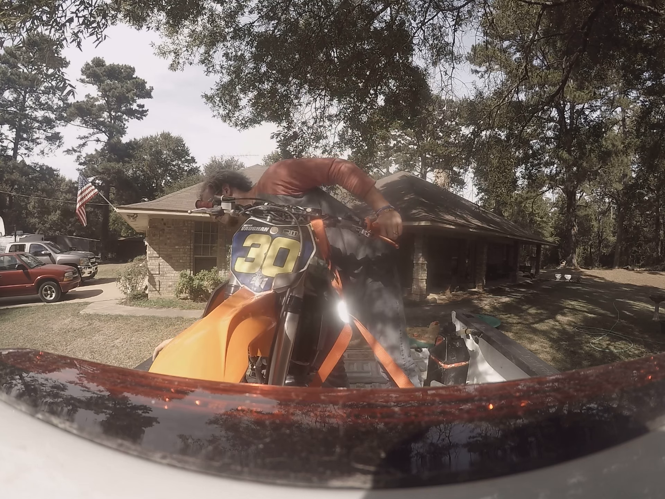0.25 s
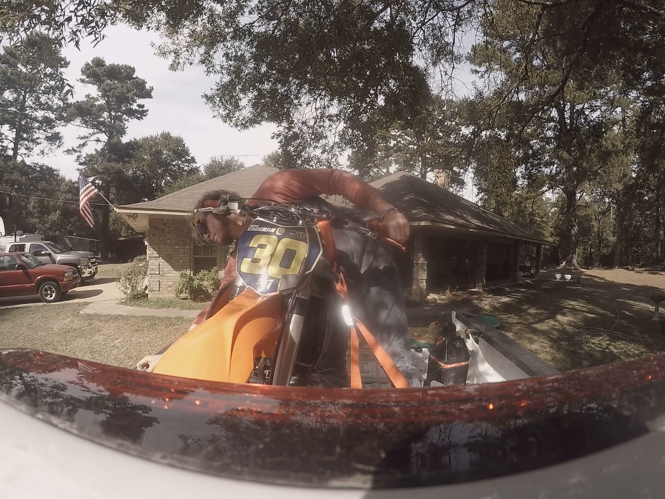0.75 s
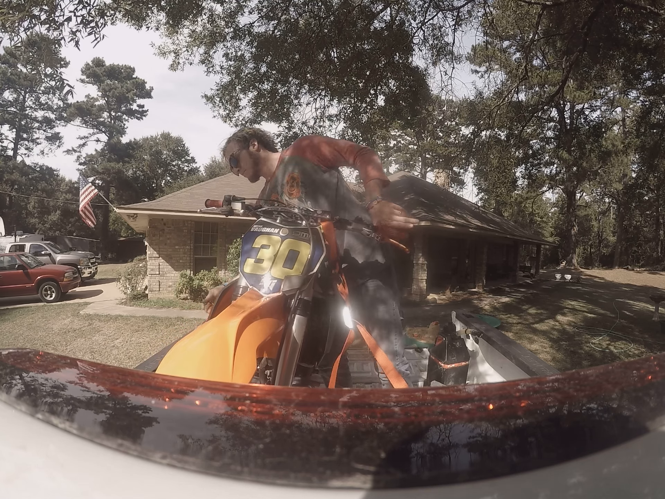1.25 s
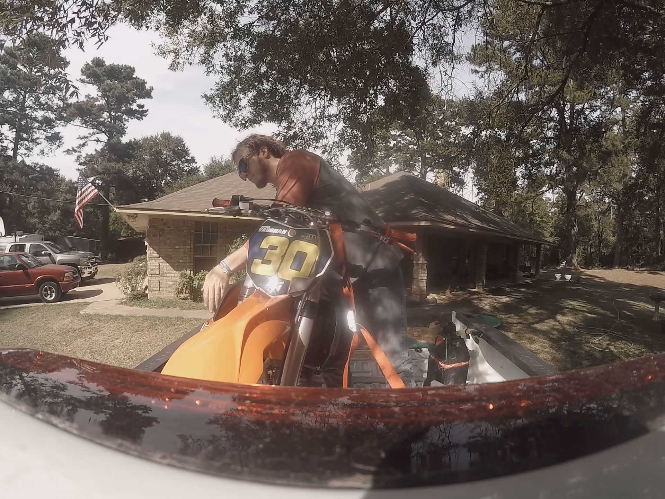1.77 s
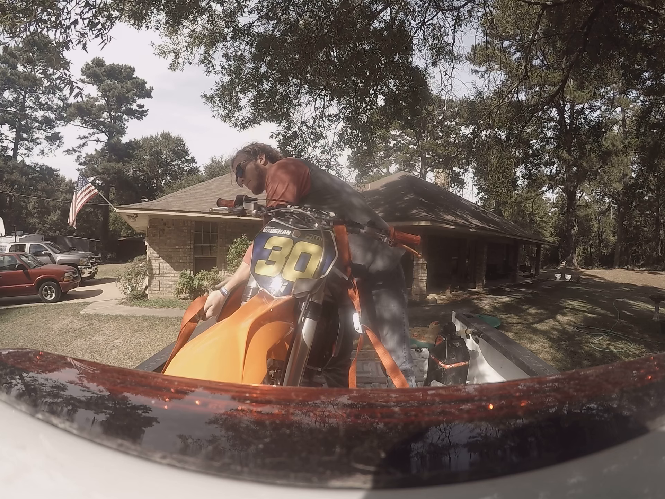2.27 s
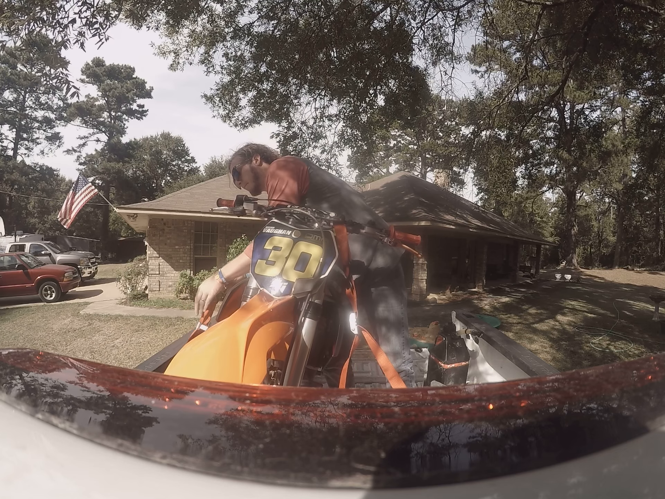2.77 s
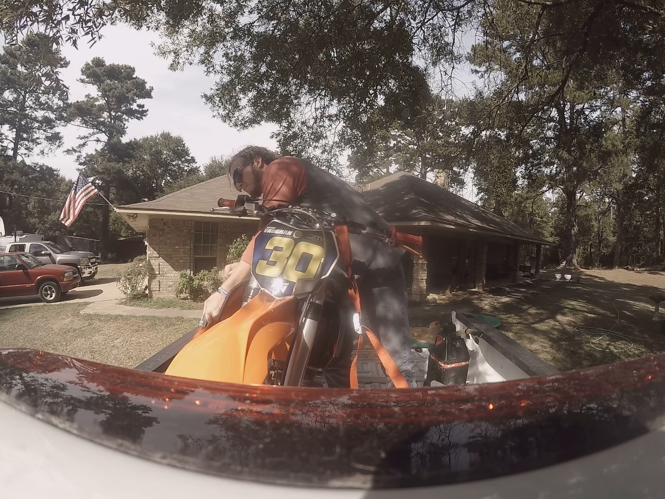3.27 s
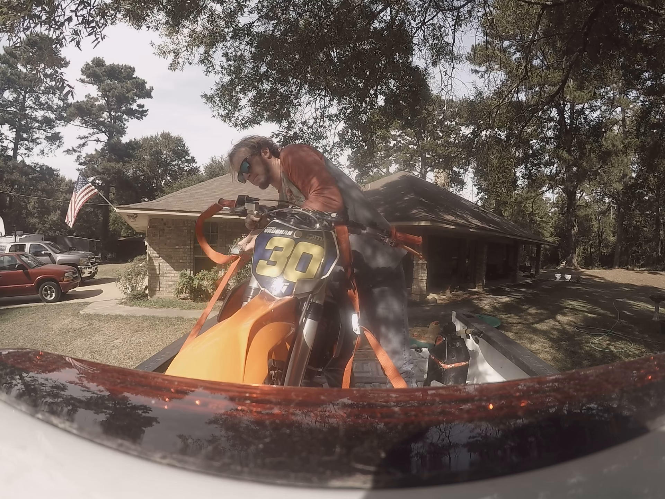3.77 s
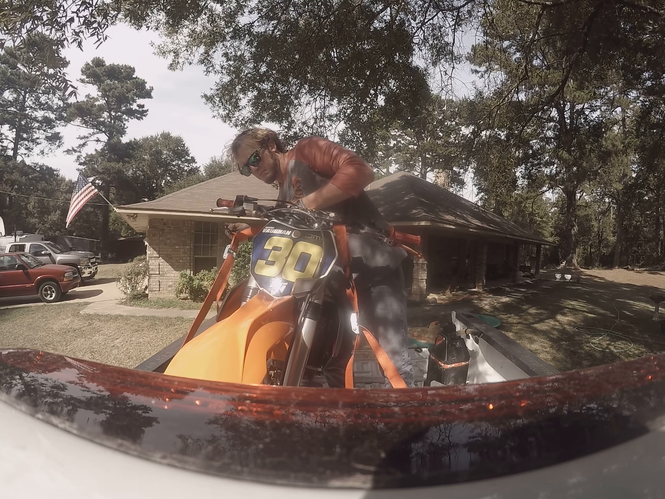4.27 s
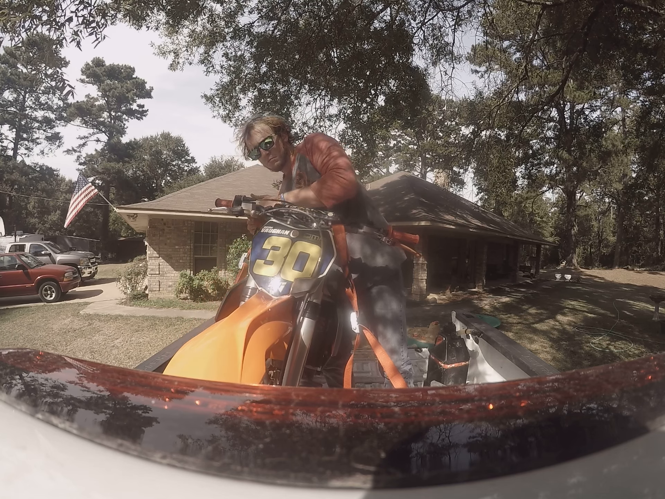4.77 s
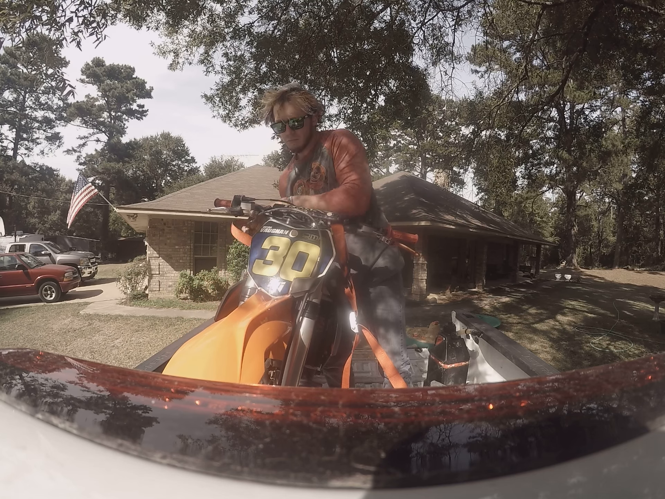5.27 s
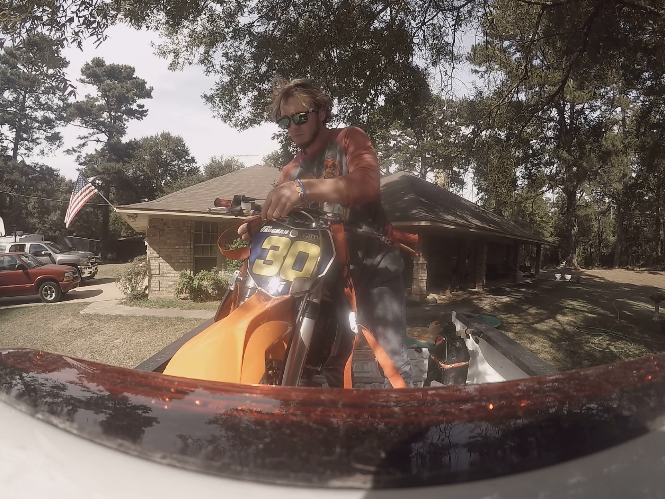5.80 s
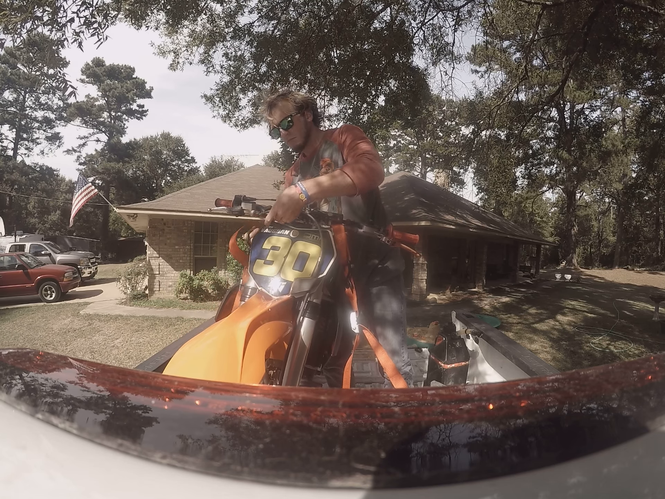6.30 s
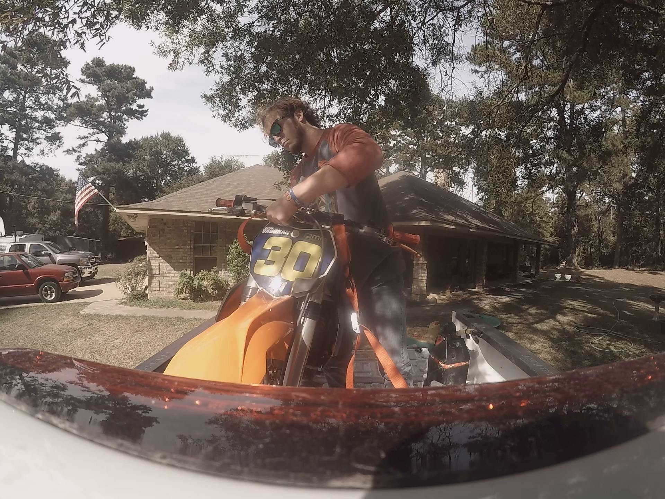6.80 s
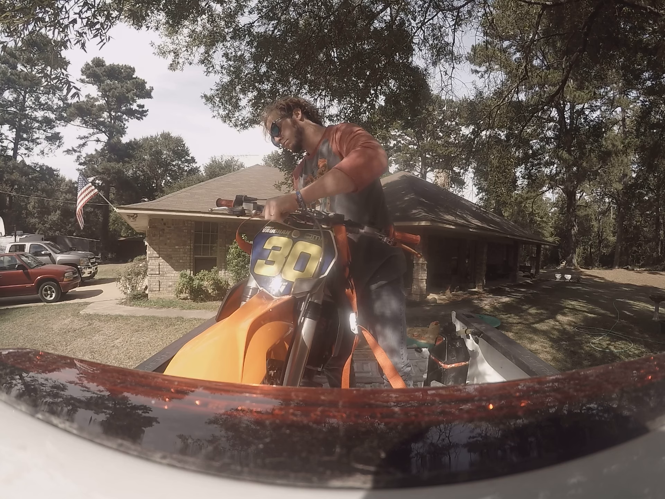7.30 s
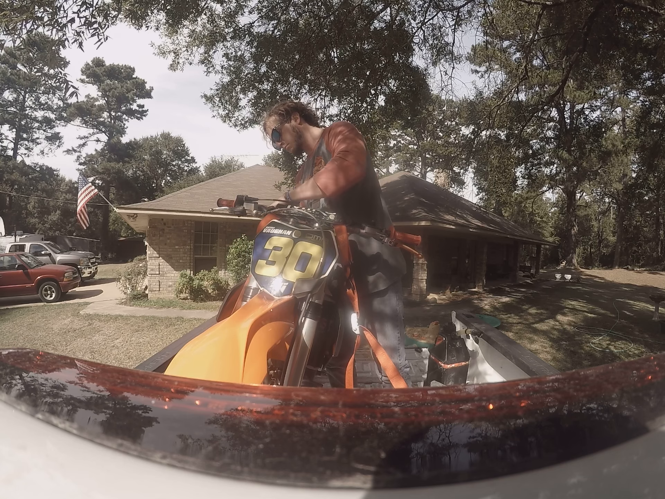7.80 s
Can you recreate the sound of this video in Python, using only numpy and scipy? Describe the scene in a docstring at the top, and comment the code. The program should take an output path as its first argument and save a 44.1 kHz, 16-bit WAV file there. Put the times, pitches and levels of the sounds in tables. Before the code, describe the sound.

Outdoors on a pickup, a heavy bed thump and loud metallic bang, then buckle clacks, zipping strap webbing, hook clinks and low gusty wind.

```python
"""Outdoors, on the roof of a pickup's cab: a motorbike is tied down in the bed behind.
Filtered noise bursts and ringing modes make the bed thump, the bike bang and the buckle clack.
Webbing hauled through the buckle is hissing, droning noise; a hook clinks in decaying sines, with dry ticks.
Beneath lie low, gusty wind noise with single eddies, a bed of still air, and faint insects:
one ticks in rasps of high noise, others trill in fuzzy, sagging whistles."""
import sys
import numpy as np
from scipy import signal
from scipy.fft import rfft, irfft, next_fast_len
from scipy.io import wavfile
from scipy.ndimage import uniform_filter1d

SR = 44100
rng = np.random.default_rng(int(sys.argv[2]) if len(sys.argv) > 2 else 0)


def materialize(psi):
    """Save the field psi as 16-bit PCM at rate SR to the path in sys.argv[1].

    A 1-D psi becomes a single channel; in a 2-D psi each row is a channel.
    """
    bounded = np.clip(np.atleast_2d(psi).T, -1, 1)
    quanta = np.round(bounded * 32767).astype(np.int16)
    wavfile.write(sys.argv[1], SR, quanta)


N = 355005
T = np.arange(N) / SR

# Levels in spectra and modes are relative; the events set how loud they come out.
# bands of a blow, boom, body, clack, snap, fizz: low edge f/Hz, high edge f/Hz, basic t60/s, rise/s
BANDS = [(66.8, 323, 0.9, 0.005), (277, 960, 0.56, 0.00033), (900, 2070, 0.36, 0.00063),
         (2200, 4630, 0.24, 0.0016), (4530, 13000, 0.24, 0.000427)]
BODY_HZ = 509  # a blow's hardness tilts the bands above the boom around this pitch

# dull thumps on the truck bed: t/s, basic level/dB, weight (boom over body)/dB,
# hardness/(dB per octave), ring time/factor
THUMPS = [(.662, -29, -2, -7.5, 0.73), (.745, -40.5, -2, -7, 0.57), (.812, -21.5, -0.5, -4.5, 0.8),
          (3.892, -51, 10, -1.5, 0.4), (4.356, -45.5, -2, -4, 0.33), (4.9, -45, -6.5, -11, 0.44),
          (5.668, -36.5, -11.5, -13, 0.45), (6.2, -41, -4, -10, 1), (6.662, -53, 8.5, -9, 0.6),
          (6.785, -44, 1.5, -7, 0.83), (7.005, -54.5, 2, -11, 0.21), (7.479, -36, -2.5, -7.5, 0.44),
          (7.502, -44, -2.5, -3.5, 0.75), (7.635, -43, -6.5, -17, 0.85)]
# modes of the bed: f/Hz, level/dB
BED_MODES = [(76, 6), (126, -19), (168, 1), (226, -3.5), (256, -4.5), (305, 6), (344, 0), (372, 11),
             (481, 3.5), (550, 1.5), (598, -1.5), (632, 15), (670, 4.5), (1106, -11), (1191, 3),
             (1243, -47), (1296, 3.5), (1850, -12.5), (2571, -19), (2717, -41), (3209, -41), (3586, -28)]
# diffuse ringing of the bed: f/Hz, level/dB
BED_COLOUR = [(40, -6.5), (110, 3.5), (220, 12), (600, 0), (1000, -1), (1900, -12), (2300, -17),
              (3300, -12), (4500, -27.5), (8000, -43.5), (15000, -45)]

# hardware banging on the bike as the strap snaps taut: t/s, basic level/dB, weight/dB,
# hardness/(dB per octave), ring time/factor
BANGS = [(1.142, -39, -10, -6.5, 1.7), (1.261, -14.5, -13.5, -2.5, 0.94), (1.422, -41.5, -19, -4.5, 1.4)]
# modes of the bike: f/Hz, level/dB
BIKE_MODES = [(327, 0.5), (362, -2.5), (590, 2.5), (617, 2.5), (689, 8.5), (738, 4), (768, -8), (822, -1.5),
              (961, -3), (1255, 2.5), (1620, -7), (1675, -16.5), (1810, -9.5), (1861, -30), (1928, -6),
              (2452, -21), (2626, -18), (2676, -24), (2741, -16.5), (2862, -21), (2919, -8), (3123, -10),
              (4131, -18), (4302, -31.5), (5554, -22), (6608, -37.5), (7118, -45.5), (7434, -43.5),
              (7624, -33)]
# diffuse ringing of the bike: f/Hz, level/dB
BIKE_COLOUR = [(100, -13.5), (230, -14), (320, -1), (480, -13.5), (780, -5), (1150, -17.5), (1800, -14),
               (2150, -22), (2800, -5.5), (4200, -14), (5500, -25.5), (7500, -21), (9000, -33),
               (15000, -37.5)]

# clacks of the buckle: t/s, basic level/dB, weight/dB, hardness/(dB per octave), ring time/factor
CLACKS = [(1.089, -50, -11, 0, .9), (2.262, -45, -4, -5, 0.97), (2.394, -38.5, -6, -3, 0.87),
          (2.724, -42.5, -8, -3, .89), (2.849, -41.5, -18.5, -6, 0.66), (2.916, -38.5, -2, -2, 0.86),
          (3.04, -36.5, -6, -4.5, 0.89), (3.372, -40, -26, -9, 1), (3.423, -37, -14, -1.2, 1),
          (4.071, -35, -6, -2.5, .91), (4.618, -36.5, -12.5, -5, .74), (4.877, -45, -1.5, -7.5, .52),
          (5.007, -43.5, -31, -11, 0.72), (5.085, -27.5, -13.5, -5, 0.99), (5.261, -31, -7.5, -3, 0.98),
          (5.334, -37.5, -4, -7, 0.42), (5.418, -38.5, -6, -9, 1), (6.235, -36, -5.5, -7, 0.68),
          (6.431, -39.5, 0, -1.96, 0.75)]
# modes of the buckle on its strap: f/Hz, level/dB
BUCKLE_MODES = [(298, -4), (330, -1), (360, -2.5), (461, -11.5), (493, -14.5), (617, -3.5), (742, -17),
                (1018, -9.5), (1126, -13.5), (1168, -5.5), (1321, -10.5), (1355, -12.5), (1430, -15.5),
                (1720, -8.5), (1950, -18.5), (2400, -11), (2627, -7.5), (2737, -8.5), (2834, -9),
                (2920, -9), (3480, -9), (3820, -1.5), (4007, -32.5), (4106, -11.5), (4290, -37.5),
                (4443, -48), (5380, -27.5), (6139, -38.5), (7788, -12.5), (8150, -23.5)]
# diffuse ringing of the buckle: f/Hz, level/dB
BUCKLE_COLOUR = [(70, -24), (230, -5.5), (330, 3), (620, 6), (850, -2), (1150, 5), (1950, -6.5),
                 (2250, -16.5), (2800, -11.5), (4400, -18.5), (5800, -30), (8300, -37), (9500, -43.5),
                 (15000, -49)]

# two hauls of webbing through the buckle, each a curve: t/s, effort/dB
PULLS = [
    [(1.14, -26), (1.15, -39), (1.21, -28.5), (1.242, -21), (1.255, -14)],
    [(3.35, -67), (3.376, -34.5), (3.442, -35.5), (3.47, -41.5), (3.608, -34.5), (3.654, -21.5),
     (3.734, -21.5), (3.804, -35), (3.95, -51.5)],
]
# hiss against drone at the reference effort, one per haul: level/dB
PULL_HISS_DB = [-6, -12.5]
REFERENCE_EFFORT_DB = -22
HISS_GROWTH = 1.05  # dB of hiss gained for each dB of effort
# rustles of loose webbing in the hands: middle t/s, level/dB, half length/s
RUSTLES = [(0.104, -47.5, 0.097), (0.66, -45.5, 0.046), (1.384, -56.5, 0.84), (2.21, -61.5, 0.072),
           (2.998, -51, 0.12), (3.973, -60.5, 0.12), (4.508, -60.5, 0.051), (5.094, -54.5, 0.37),
           (5.694, -55.5, 0.36), (6.524, -50, 0.15), (6.824, -49, 0.083), (7.667, -51, 0.094),
           (8.042, -50, 0.051)]
# tone of the rubbing weave: f/Hz, level/dB
WEBBING_COLOUR = [(100, -5.5), (230, 4), (320, -0.5), (440, 6), (570, -0.5), (800, -3), (1100, -6.5),
                  (1900, -18.5), (2200, -21.5), (2700, -21.5), (3300, -27.5), (4500, -26.5), (7000, -41),
                  (15000, -54)]
# resonances driven by the taut strap: f/Hz, level/dB
STRAP_MODES = [(224, -6.5), (297, -3), (348, 3), (514, -0.5), (562, 5.5), (592, 7), (633, -24), (750, -2.5),
               (1165, -19.5), (1266, -8.5)]

# clinks of the hook: t/s, level/dB, hardness/(dB per octave),
# level of the ring near 4.2 kHz/dB (above 0 weaker, below 0 stronger)
CLINKS = [(1.222, -29.5, -1, 1), (1.232, -35, -2, -3), (1.244, -35, -1, -6), (6.235, -43.5, -8.5, 14),
          (6.434, -46, -7.5, 21), (6.55, -41, -3, -3), (6.754, -40, -2.5, -0.5), (6.821, -38, -1, -4.5),
          (6.836, -40, -3, 4)]
# modes of the hook: f/Hz, level/dB, t60/s
HOOK_MODES = [(1077, -4.5, 0.24), (1330, -14, 0.16), (1624, -9, 0.13), (2140, -15.5, 0.111),
              (2740, -10, 0.11), (3090, 1.5, 0.072), (3280, -8, 0.14), (3416, 2, 0.17), (3560, -29, 0.138),
              (3820, -5, 0.2), (4190, 3.5, 0.21), (4302, 1.5, 0.25), (4901, -7, 0.37), (6840, -24, .26)]
# small dry ticks of the hardware: t/s, level/dB, centre f/Hz, t60/s
TICKS = [(.297, -42, 1380, 0.041), (3.371, -45.5, 2940, 0.037), (3.874, -33, 3800, 0.0064),
         (4.14, -55.5, 2540, .13), (5.42, -70, 2760, .14), (5.563, -42, 1990, .028),
         (5.639, -47.5, 2200, 0.023), (5.842, -29, 900, 0.015), (5.957, -58, 2450, .08),
         (6.257, -42, 2200, .05), (6.401, -34.5, 900, 0.057), (6.471, -45.5, 3160, .02),
         (6.487, -47.5, 2400, 0.018), (6.896, -50.5, 2820, .061), (7.26, -55.5, 1850, 0.054),
         (7.37, -55.5, 2200, .03), (7.479, -36.5, 900, 0.082), (7.607, -36.5, 800, 0.07)]

# strength of the wind at the microphone, before gusts and trim: t/s, level/dB
WIND = [(0.0, -32), (0.29, -32.5), (0.49, -44.5), (0.94, -39), (1.08, -44.5), (2.62, -47), (3.2, -27),
        (3.27, -45.5), (3.32, -30), (3.45, -41), (3.59, -28), (4.21, -50), (4.26, -37.5), (4.71, -43),
        (4.8, -33), (4.97, -54), (5.11, -35.5), (6.1, -42.5), (6.14, -32.5), (6.37, -49), (6.43, -35),
        (6.99, -33.5), (7.33, -45.5), (7.38, -33), (7.42, -42), (8.05, -56)]
# tone of the wind: f/Hz, level/dB
WIND_COLOUR = [(10, -20), (26, 6.5), (50, -0.5), (78, -5), (115, -14), (170, -25), (300, -44), (800, -86)]
# single eddies striking the microphone: t/s, peak level/dB, f/Hz
EDDIES = [(3.07, -23.5, 44.7), (3.109, -21, 50.3), (3.147, -18, 84), (3.168, -25, 35.7),
          (3.316, -23.5, 32.7), (3.574, -25, 42.3), (5.361, -25, 45.3), (5.44, -28, 35), (6.44, -31, 36),
          (6.548, -24.5, 37.6), (6.607, -22.5, 41.6), (6.754, -22.5, 64), (6.966, -19, 44.3),
          (7.369, -24, 37)]

# tone of the outdoor air: f/Hz, level/dB
AIR_COLOUR = [(59, -25), (100, -3), (140, -5.5), (274, -9), (383, -8), (482, -13), (983, -17),
              (1880, -23.5), (2920, -22.5), (7350, -31), (13800, -36), (15000, -37.5)]
AIR_DB = -59.0
# an insect high in the trees ticks, then doubles its pace: start t/s, length/s, strokes/(per s),
# starting level/dB, swell/(dB per s)
TICKING = [(1.403, 1.6, 13.4, -70, 0.5), (2.995, .78, 27, -77, 15)]
# swells of a distant insect trill: middle t/s, level/dB, half length/s, middle f/Hz
TRILLS = [(2.2, -69, 0.27, 3040), (2.88, -70, 0.14, 3000), (4.87, -71, 0.16, 3000),
          (7.9, -72.5, 0.37, 2990)]
TRILL_SAG_HZ_PER_S, TRILL_WAVER_HZ = 330, 35

EDGE_HZ = 15400  # top of the treble


def amp(db):
    """Decibels to gain."""
    return 10 ** (np.asarray(db) / 20)


def evened(x):
    """Scales to rms 1."""
    return x / np.sqrt(np.mean(x ** 2) + 1e-20)


def add(mix, s, sound):
    """Lays a sound into the mix at s seconds."""
    part = mix[max(round(s * SR), 0):][:len(sound)]
    part += sound[:len(part)]


def band(x, low_hz, high_hz, order=3):
    """Causal band-pass."""
    edges_hz = [low_hz, min(high_hz, SR / 2 - 100)]
    return signal.sosfilt(signal.butter(order, edges_hz, "band", fs=SR, output="sos"), x)


def coloured(x, points):
    """Shapes x by a curve of (f/Hz, level/dB) points, at rms 1."""
    hz, db = np.transpose(points)
    size = next_fast_len(len(x))
    bins_hz = np.fft.rfftfreq(size, 1 / SR)
    gain = amp(np.interp(np.log(bins_hz + 1), np.log(hz), db))
    return evened(irfft(rfft(x, size) * gain, size)[:len(x)])


def wander(per_s):
    """Random motion of rms 1 with per_s turning points a second; it holds still once 4096 are spent."""
    knots = rng.standard_normal(4096)
    return evened(np.interp(T * per_s, np.arange(len(knots)), knots))


def swell(middle_s, half_s):
    """A smooth rise and fall, of height 1."""
    return np.exp(-np.minimum(((T - middle_s) / half_s) ** 2, 50))


def blows(events, modes, colour, bands_db, tonal_db, clatter_db, clatter_s, spread_db, detune,
          crunch_db, mode_ring, body_ring):
    """Each blow clatters briefly, rings the object's modes and echoes; weight booms, hardness brightens.

    Per band, bands_db is how readily the object sounds and tonal_db how clearly its modes ring."""
    out, t = np.zeros(N), T[:SR * 3 // 4]
    head = SR // 25  # the first 40 ms set the level
    hz, mode_db = np.transpose(modes)[:, :, None]
    octaves = np.log2([np.sqrt(low_hz * high_hz) / BODY_HZ for low_hz, high_hz, _, _ in BANDS])
    for s, level_db, weight_db, hardness_db, ring in events:
        tilt_db = np.append(weight_db, hardness_db * octaves[1:])
        levels_db = level_db + np.array(bands_db) + tilt_db
        # contact point and strap tension differ each time
        share, phase, shift = rng.standard_normal((3, len(modes), 1))
        mode_gain = amp(mode_db + spread_db * share)
        mode_hz = hz * (1 + detune * shift)
        tones = (mode_gain * np.sin(2 * np.pi * (mode_hz * t + phase))).sum(0)
        clatter = 1 + amp(clatter_db) * np.exp(-(t / clatter_s) ** 2)  # loud until the parts settle
        echoes = coloured(rng.standard_normal(len(t)), colour)
        echoes = echoes * amp(crunch_db * wander(300)[:len(t)])
        for db, modes_db, (low_hz, high_hz, t60, rise_s) in zip(levels_db, tonal_db, BANDS):
            # light parts hold their low notes less long
            ring_s = t60 * max(ring, .1) * (body_ring if low_hz < BODY_HZ else 1)
            rise, fall_db = 1 - np.exp(-t / rise_s), -60 * t / ring_s
            layers = np.array([tones * amp(fall_db / mode_ring), echoes * amp(fall_db)])
            ringing, diffuse = band(layers * rise * clatter, low_hz, high_hz)
            part = amp(modes_db) * ringing / np.std(ringing[:head]) + diffuse / np.std(diffuse[:head])
            add(out, s, amp(db) * part / np.std(part[:head]))
    return out


def bed_thumps():
    """The truck bed is struck: dull, with steady, mildly detuned modes."""
    return blows(THUMPS, BED_MODES, BED_COLOUR,
                 bands_db=(0.27, -0.077, 0.92, 0.38, -1.2), tonal_db=(-2.5, -5, -4.5, -12, -10),
                 clatter_db=-9, clatter_s=.016, spread_db=0.4, detune=0.0074,
                 crunch_db=1.0, mode_ring=1.06, body_ring=1.0)


def bike_bangs():
    """Hardware strikes the bike: its modes ring clearly and their balance varies from bang to bang."""
    return blows(BANGS, BIKE_MODES, BIKE_COLOUR,
                 bands_db=(-0.94, -0.012, -0.68, 0.77, -2.1), tonal_db=(-1, -2, -5, -4, -3),
                 clatter_db=-3.0, clatter_s=0.03, spread_db=4.3, detune=0.00081,
                 crunch_db=-2.4, mode_ring=0.86, body_ring=0.88)


def buckle_clacks():
    """The buckle clacks on its strap: strong clatter, and low notes that die a little sooner."""
    return blows(CLACKS, BUCKLE_MODES, BUCKLE_COLOUR,
                 bands_db=(0.58, -0.34, 0.53, 0.32, -3.3), tonal_db=(-0.5, -1, -3.0, -5.0, -11),
                 clatter_db=-1.0, clatter_s=0.022, spread_db=3, detune=.008,
                 crunch_db=2.5, mode_ring=0.94, body_ring=0.85)


def webbing(drone_modes_db=10, mode_width_hz=20, grain_db=1.15, flutter_db=-1.63, pull_db=-1,
            rustle_flutter_db=3, rustle_hiss_db=-5):
    """The weave rubs in fine slips: a hiss at the buckle, and a drone where the taut strap drives the bed."""
    t = T[:SR // 4]
    modes = sum(amp(db) * np.cos(2 * np.pi * hz * t) for hz, db in STRAP_MODES)
    modes = modes * np.exp(-np.pi * mode_width_hz * t)
    # impulse response: the direct rub plus the ringing modes
    response = (t == 0) + amp(drone_modes_db) * 2 * np.pi * mode_width_hz / SR * modes
    slips = rng.standard_normal(N) * amp(grain_db * wander(990))
    rub = coloured(signal.fftconvolve(slips, response)[:N], WEBBING_COLOUR)
    drone = evened(band(rub, 130, 930))
    hiss = evened(band(rub, 1525, 22000, order=2))
    hauled = np.zeros(N)
    for pull, hiss_db in zip(PULLS, PULL_HISS_DB):
        s, effort_db = np.transpose(pull)
        gate = uniform_filter1d(1. * ((T > s[0]) & (T < s[-1])), size=600)
        effort = amp(np.interp(T, s, effort_db) - REFERENCE_EFFORT_DB)
        hauled += gate * (drone * effort + amp(hiss_db) * hiss * effort ** HISS_GROWTH)
    hauled = hauled * amp(REFERENCE_EFFORT_DB + pull_db + flutter_db * wander(70))
    handling = sum(amp(db) * swell(s, half_s) for s, db, half_s in RUSTLES)
    loose = (drone + amp(rustle_hiss_db) * hiss) * handling * amp(rustle_flutter_db * wander(45))
    return hauled + loose


def hook_clinks(scrape_db=-4, scrape_t60=0.046, spread_db=3.3, centre_hz=4150, width_hz=450):
    """The steel hook rings with a brief scrape; hardness tilts it, and each clink has its own ring near centre_hz."""
    out, t = np.zeros(N), T[:SR // 2]
    hz, mode_db, t60 = np.transpose(HOOK_MODES)[:, :, None]
    nearness = np.exp(-((hz - centre_hz) / width_hz) ** 2)
    rise = 1 - np.exp(-t / 0.0013)
    for s, db, hardness_db, cut_db in CLINKS:
        share, phase = rng.standard_normal((2, len(HOOK_MODES), 1))
        start_db = mode_db + spread_db * share + hardness_db * np.log2(hz / 4000) - cut_db * nearness
        ring = (amp(start_db - 60 * t / t60) * np.sin(2 * np.pi * (hz * t + phase))).sum(0)
        scrape = band(rng.standard_normal(len(t)) * amp(-60 * t / scrape_t60), 610, 2900, order=2)
        scrape = scrape / np.std(scrape[:SR // 200])  # levelled on its first 5 ms
        add(out, s, amp(db) * (ring / 2 + amp(scrape_db) * scrape) * rise)
    return out


def hardware_ticks(tail_db=-24, tail_t60=0.045, span_octaves=1.05):
    """Tiny contacts as short bursts of banded noise, each with a faint tail for the bed's echo."""
    out, t = np.zeros(N), T[:SR // 5]
    half_span = 2 ** (span_octaves / 2)
    for s, db, hz, t60 in TICKS:
        fade = amp(-60 * t / t60) + amp(tail_db - 60 * t / tail_t60)
        noise = rng.standard_normal(len(t))
        # the unfaded noise serves only to set the level
        tick, steady = band(np.array([noise * fade, noise]), hz / half_span, hz * half_span, order=2)
        add(out, s, amp(db) * tick / np.std(steady))
    return out


def wind(trim_db=-2.5, gust_db=3.5, gusts_per_s=14):
    """Lumpy low turbulence in quick gusts, with single eddies that push and pull once."""
    turbulence = coloured(rng.standard_normal(N), WIND_COLOUR)
    turbulence /= np.sqrt(uniform_filter1d(turbulence ** 2, size=SR // 6))
    out = turbulence * amp(trim_db + np.interp(T, *np.transpose(WIND)) + gust_db * wander(gusts_per_s))
    for s, db, hz in EDDIES:
        u = (np.pi * hz * (T - s)) ** 2
        out += amp(db) * (1 - 2 * u) * np.exp(-np.minimum(u, 50))
    return out


def ticking_insect(stroke_width=0.17, backstroke_db=-6, rasp_db=3.5, low_hz=11800):
    """Each wing stroke is a broken rasp, with a weaker one on the way back."""
    out = np.zeros(N)
    rasp = band(rng.standard_normal(N), low_hz, 17600, order=2) * amp(rasp_db * wander(120))
    for s, length, rate, db, swell_db in TICKING:
        t = T[:int(length * SR)]
        cycle = np.array([t * rate, t * rate + .5]) % 1  # the backstroke lies half a cycle away
        forth, back = np.exp(-((cycle - .5) / stroke_width) ** 2)
        strokes = evened(rasp[:len(t)] * (forth + amp(backstroke_db) * back))
        add(out, s, amp(db + swell_db * t) * strokes)
    return out


def trilling_insects(width_hz=90, fuzz_db=-3):
    """Fuzzy whistles that swell and fade while their pitch sags."""
    flicker = evened(band(rng.standard_normal(N), 5, width_hz, order=2))
    fuzz = np.sqrt(2) * evened(1 + amp(fuzz_db) * flicker)
    out = np.zeros(N)
    for s, db, half_s, hz in TRILLS:
        pitch = hz - TRILL_SAG_HZ_PER_S * (T - s) + TRILL_WAVER_HZ * wander(150)
        out += amp(db) * swell(s, half_s) * np.sin(2 * np.pi * np.cumsum(pitch) / SR)
    return fuzz * out


def still_air():
    """Still outdoor air: steady noise that darkens towards the treble."""
    return amp(AIR_DB) * coloured(rng.standard_normal(N), AIR_COLOUR)


def scene():
    """Every source summed at one microphone."""
    tie_down = bed_thumps() + bike_bangs() + buckle_clacks() + webbing() + hook_clinks() + hardware_ticks()
    background = wind() + ticking_insect() + trilling_insects() + still_air()
    return (tie_down + background)[None]


def record(dry):
    """Cuts the treble above EDGE_HZ with a steep linear-phase low-pass."""
    low_pass = signal.firwin(511, EDGE_HZ, window=("kaiser", 9), fs=SR)
    return signal.oaconvolve(dry, low_pass[None], "same")


dry = scene()
out = record(dry)
materialize(out)
```